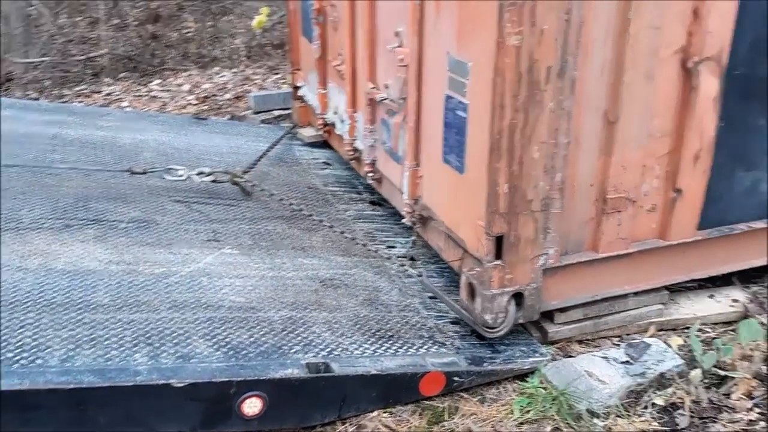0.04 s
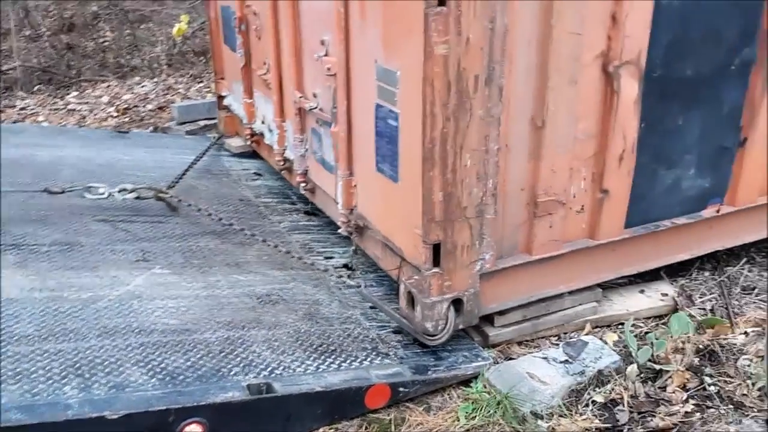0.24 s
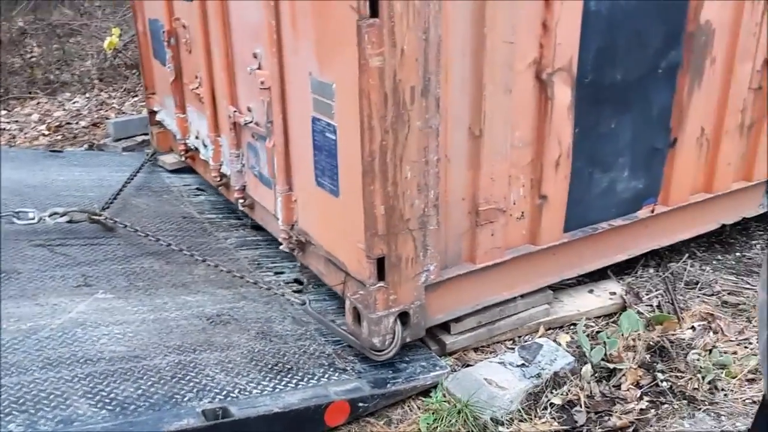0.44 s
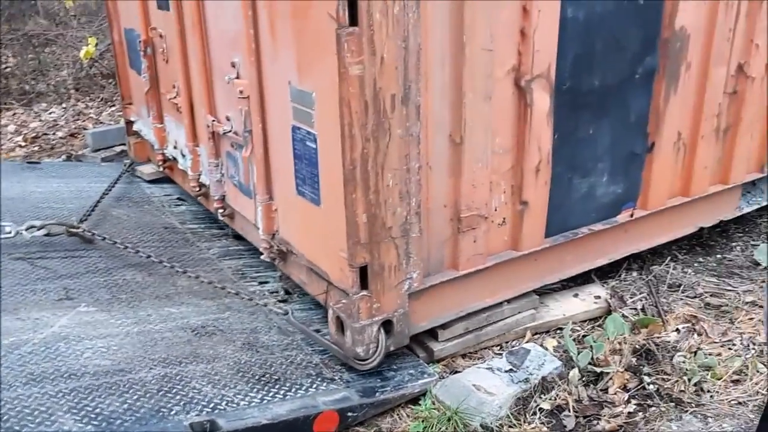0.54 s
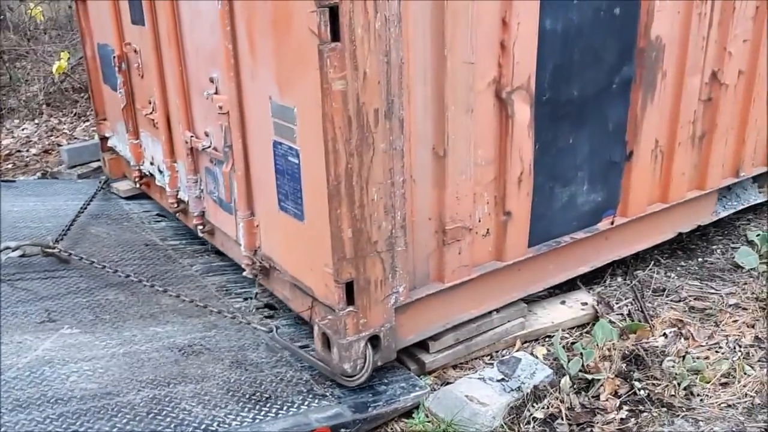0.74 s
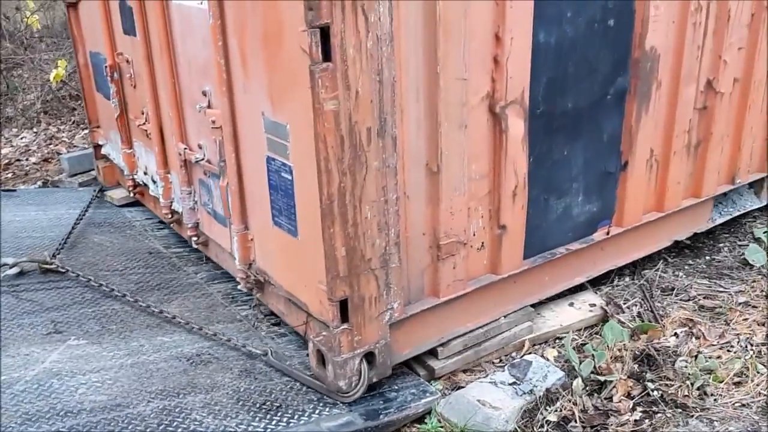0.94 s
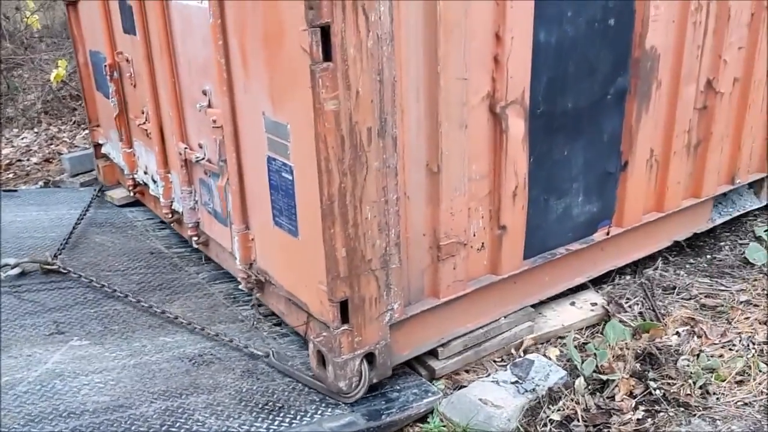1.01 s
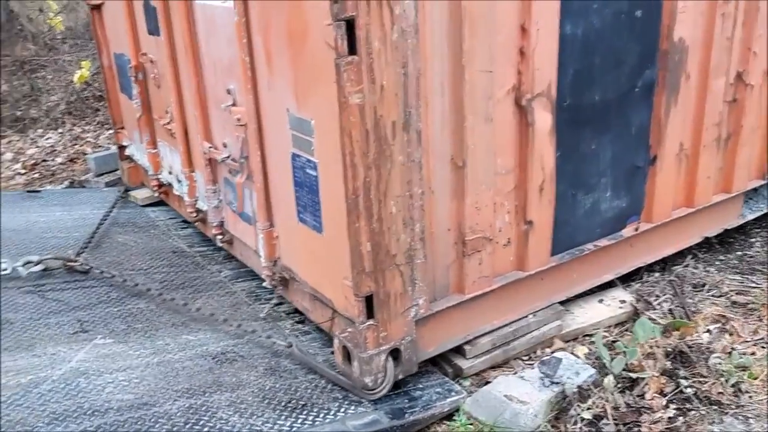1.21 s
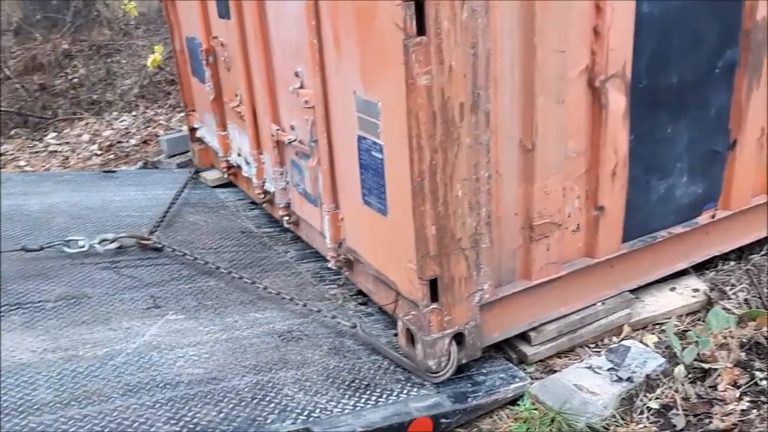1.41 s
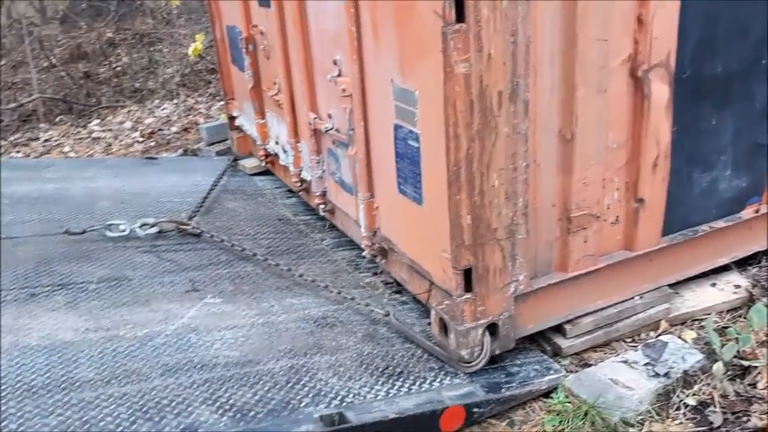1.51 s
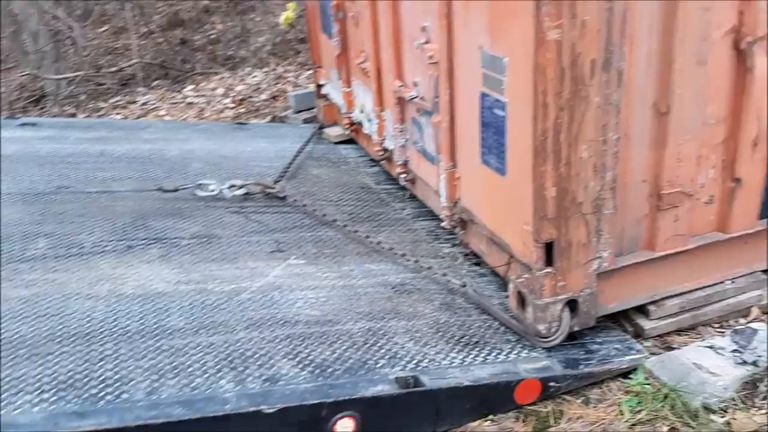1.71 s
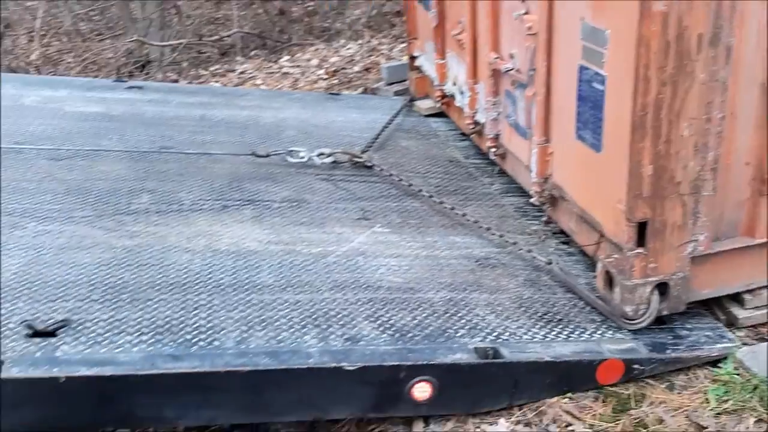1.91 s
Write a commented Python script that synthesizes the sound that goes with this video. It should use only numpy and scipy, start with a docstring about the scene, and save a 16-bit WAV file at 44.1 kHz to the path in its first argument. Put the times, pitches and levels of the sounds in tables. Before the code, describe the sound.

Heavy steel container groans across a truck bed and crashes down, chains jingling.

```python
"""Two juddering groans come first, as a steel shipping container is winched over a truck's tilted bed.
The steel sticks and slips many times a second, and each slip shakes the hollow box.
Then the container drops with a booming crash and a short scrape. Chains clank and jingle as they
take up the load, and grit cracks under the steel. The truck idles and rumbles behind it all, outdoors."""
import sys
import numpy as np
from scipy import signal
from scipy.fft import rfft, irfft
from scipy.io import wavfile

SR = 44100
rng = np.random.default_rng(int(sys.argv[2]) if len(sys.argv) > 2 else 0)


def bounce(signal):
    """Save signal as a 16-bit WAV file at the path given by the first command-line argument."""
    frames = np.transpose(np.atleast_2d(signal))
    limited = np.clip(frames, -1, 1)
    pcm = np.round(limited * 32767).astype(np.int16)
    wavfile.write(sys.argv[1], SR, pcm)


N = 85995
TIME = np.arange(N) / SR

# One list for each shudder. Each row: time in seconds, slips per second, force in dB.
SHUDDER_SLIPS = [
    [(.2078, 48.2, 3.5), (.23, 44.7, 1.5), (.252, 60.5, -3.5), (.283, 67.5, -8.5), (.3, 64, -22.5),
     (.4, 53, -19), (.52, 54.5, -27.5)],
    [(.656, 48.4, -17), (.678, 45.9, -8.5), (.7, 43.7, -20), (.72, 47, -4), (.77, 53, -6),
     (.815, 90.7, -7.5), (.87, 89, -8), (.905, 88, -23.5), (.96, 79, -19)],
]
# The container wall's tones. Each row: pitch in Hz, relative level in dB, fade time in seconds.
WALL_TONES = [(168.9, -5, 0.15), (264.4, 2.5, 0.044), (316.5, -4, 0.03), (347, -6.5, 0.037),
              (422.6, -15.5, 0.11)]
# The tone colour of the hollow box. Each row: frequency in Hz, relative level in dB.
HOLLOW_COLOUR = [(90, -31), (170, 9), (350, -7.5), (500, 1), (1000, -43), (3000, -22), (6500, -24),
                 (16000, -82)]

def shudder():
    """Each slip kicks the container wall and a panel, stirs the hollow box and rasps on the bed."""
    kicks = np.zeros(N)
    for points in SHUDDER_SLIPS:
        times, rates, force_db = np.transpose(points)
        t = np.arange(times[0], times[-1], 1 / SR)
        rate = np.interp(t, times, rates) * (1 + .012 * waver(per_s=74)[:len(t)])
        slip_count = np.floor(np.cumsum(rate) / SR)
        slip_times = t[np.diff(slip_count, prepend=-1) > 0]
        uneven_db = 1.2 * rng.standard_normal(N)[:len(slip_times)]
        kicks[(slip_times * SR).astype(int)] = amp(np.interp(slip_times, times, force_db) + uneven_db)
    wall = sum(amp(db) * decay(fade_s, rise_s=0.0014) * np.sin(2 * np.pi * hz * TIME)
               for hz, db, fade_s in WALL_TONES)
    wall = signal.sosfilt(signal.butter(3, [146.4, 423], "band", fs=SR, output="sos"), wall)
    panel = amp(-21) * decay(0.052, rise_s=0.0027) * np.sin(2 * np.pi * 672 * TIME)
    hollow = amp(-29) * coloured(HOLLOW_COLOUR) * decay(0.62, rise_s=0.007)
    rasp = amp(-26) * coloured(CRASH_COLOUR) * decay(0.049, rise_s=0.0032)
    one_slip = amp(-2) * wall + panel + hollow + rasp
    return signal.fftconvolve(kicks[None], one_slip, axes=1)[:, :N]  # one copy for every kick


# The container hits the bed. Each row: start in seconds, boom in dB, crash in dB, crash fade in seconds.
LANDING_BLOWS = [(.992, -15.5, -19, 0.32), (1.006, -13.5, -19, 1), (1.054, -14.5, -18.5, 0.24),
                 (1.143, -26, -21, 0.48), (1.176, -24.5, -13.5, 0.11), (1.187, -23.5, -19, 0.14),
                 (1.22, -21.5, -23, 0.23), (1.615, -25.5, -33, 0.13)]
# The tone colours of the deep boom and the bright crash. Each row: frequency in Hz, relative level in dB.
BOOM_COLOUR = [(30, -35), (70, -24), (130, -4), (200, 1.5), (310, -4.5), (430, -3.5), (520, -27),
               (1200, -22), (16000, -84)]
CRASH_COLOUR = [(60, -40), (400, 3), (900, -1), (1600, 0.5), (2500, 2), (4200, -7.5), (6300, -7.5),
                (8500, -28), (16000, -29)]

def landing():
    """The container drops: the box booms, and the steel bed crashes and rings."""
    out = np.zeros((2, N))
    for start, boom_db, crash_db, fade_s in LANDING_BLOWS:
        steel = coloured(CRASH_COLOUR, grains(per_s=2500, spread_db=3.0)) + amp(-4) * bed_ring()
        crash = amp(crash_db) * evened(steel) * decay(fade_s, rise_s=0.00092)
        boom = amp(boom_db) * coloured(BOOM_COLOUR) * decay(0.4, rise_s=0.00024)
        add(out, start, boom + crash)
    return out


# The steel bed's tones. Each entry: pitch in Hz.
BED_TONES_HZ = [649, 856, 894, 938, 997, 1190, 1366, 1513, 1996, 2130, 2326, 2621]

def bed_ring():
    """The bed rings with many tones; the higher ones differ more between left and right."""
    hz = np.array(BED_TONES_HZ)[:, None]
    unlike = np.clip(1 - read(STEREO_LIKENESS, hz), 0, 1)
    phase = rng.uniform(0, 2 * np.pi, hz.shape) + unlike * rng.standard_normal((2,) + hz.shape)
    tones = amp(read(CRASH_COLOUR, hz)) * np.sin(2 * np.pi * hz * TIME + phase)
    return evened(tones.sum(1))


# The chain clanks. Each row: start in seconds, knock in dB, knock fade in seconds, snap in dB,
# ring in dB, the part that rings.
CHAIN_CLANKS = [(0.328, -22.5, 0.097, -31, -24, "hook"), (0.9745, -26, 0.39, -37, -23.5, "hook"),
                (1.0136, -9, 0.041, -50, -16.5, "lug"), (1.165, -28, 0.039, -22, -38.5, "chain"),
                (1.1765, -16, 0.095, -54, -17, "lug"), (1.2186, -17, 0.073, -25.5, -18, "shackle"),
                (1.327, -57, 0.13, -36, -33.5, "chain"), (1.3572, -31.5, 0.23, -33, -48, "chain"),
                (1.3835, -29, 0.054, -48, -35, "chain"), (1.466, -35.5, 0.14, -29.5, -27.5, "chain"),
                (1.495, -29, 0.074, -32, -41, "chain"), (1.5462, -14.5, 0.078, -26.5, -22.5, "link"),
                (1.6148, -24.5, 0.099, -63, -34, "chain"), (1.728, -25.5, 0.25, -24, -28.5, "chain"),
                (1.8051, -34.5, 0.15, -39.5, -35.5, "chain"), (1.8652, -33, 0.16, -28.5, -43, "chain"),
                (1.8858, -27.5, 0.15, -45, -44, "chain")]
# The tone colours of a knock and a snap. Each row: frequency in Hz, relative level in dB.
KNOCK_COLOUR = [(300, -18), (900, -3), (1300, 0), (2400, 7.5), (3600, 5), (4600, -43), (6200, -30),
                (8000, -70), (16000, -32)]
SNAP_COLOUR = [(2000, -7.5), (5000, 5.5), (6600, 4.5), (8000, -2), (10500, -6), (12500, -5.5), (16000, -22)]

def chains():
    """A clank is a knock on the bed, a bright snap, a shimmer of links and one ringing steel part."""
    out = np.zeros((2, N))
    for start, knock_db, fade_s, snap_db, ring_db, part in CHAIN_CLANKS:
        knock = amp(knock_db) * coloured(KNOCK_COLOUR) * decay(fade_s)
        snap = coloured(SNAP_COLOUR) * decay(0.069)
        shimmer = amp(-9.5) * link_shimmer(count=22) * decay(0.19)
        add(out, start, knock + amp(snap_db) * (snap + shimmer) + amp(ring_db) * part_ring(part))
    return out


# One list for each steel part. Each row: pitch in Hz, relative level in dB, fade time in seconds.
PART_TONES = {"hook": [(2024, -4.5, 0.14), (2360, -3, 0.14), (2918, 5.5, 0.046), (3220, 1.5, 0.19),
              (4000, 1.5, 0.13), (5520, -9, .27), (5980, -8.5, 0.2), (6700, -8.5, 0.27), (9060, -18, 0.4),
              (9500, -15, 0.25), (10400, -11.5, 0.42)], "link": [(1270, 0.5, 0.053), (1740, 7, 0.044),
              (2505, 1.5, 0.065), (3634, 10, 0.071), (4000, 0, 0.11), (5450, -11, 0.35), (6040, -11, 0.56),
              (8530, -21.5, 0.59), (9260, -15, .3), (9840, -6.5, 0.15), (10500, -16, 0.17),
              (11360, -12.5, 0.21)], "shackle": [(2284, 5, 0.12), (2344, -0.5, 0.15), (6180, -6.5, 0.11),
              (7100, -9, 0.078), (10440, -17.5, 0.23)], "lug": [(2180, -9, 0.082), (2453, 5.5, 0.032),
              (2960, -6, 0.054)], "chain": [(3100, -8, 0.58), (3810, -2, 0.41), (4200, -8, 0.54),
              (4500, -19, 0.14), (5180, -2.5, 0.17), (7220, -15, 0.13), (10030, -7, 0.16)]}

def part_ring(part):
    """Each tone of a steel part pulses against a close twin and wobbles as the part chatters."""
    out = np.zeros((2, N))
    for hz, db, fade_s in PART_TONES[part]:
        cycles = np.cumsum(hz * (1 + .011 * waver(per_s=220)))[:SR // 2] / SR
        twin_cycles = cycles * (1 + .02 * rng.uniform(-1, 1))
        tone = np.sin(2 * np.pi * (cycles + rng.random((2, 1))))
        twin = amp(-6) * np.sin(2 * np.pi * (twin_cycles + rng.random((2, 1))))
        loudness = decay(fade_s) * (1 + 0.6 * waver(per_s=220))
        side_gains = amp(db + 1.5 * rng.standard_normal((2, 1)))
        add(out, 0, side_gains * loudness[:len(cycles)] * (tone + twin))
    return out


def link_shimmer(count):
    """Links that happen to touch give off high, unrelated tones."""
    spectrum = np.zeros((2, N // 2 + 1), complex)
    hz = np.geomspace(3000, 14500, count) * rng.uniform(.96, 1.04, count)
    phases = np.exp(2j * np.pi * rng.random((2, count)))
    spectrum[:, (hz * N / SR).astype(int)] = amp(read(SNAP_COLOUR, hz)) * phases
    return evened(irfft(spectrum, N))


# How loud the grinding steel and the loose chain are. Each row: time in seconds, level in dB.
SCRAPE_LEVELS = [(0, -53), (.2, -55), (.25, -44), (.31, -49), (.5, -52), (.68, -54), (.8, -49), (.97, -48),
                 (1.02, -26), (1.037, -16), (1.06, -25), (1.12, -39), (1.17, -34), (1.3, -50), (1.95, -54)]
RATTLE_LEVELS = [(0, -49), (.25, -42), (.66, -45), (.96, -45.5), (1.05, -23), (1.21, -32.5), (1.33, -34.5),
                 (1.7, -38.5), (1.95, -44.5)]
# The tone colours of grit and loose chain. Each row: frequency in Hz, relative level in dB.
GRIT_COLOUR = [(200, -11), (900, 10.5), (2000, -3), (3500, 4), (6500, 3.5), (8500, -4), (11000, -2),
               (16000, -16)]
LOOSE_CHAIN_COLOUR = [(200, -24), (500, 1.5), (1000, 3.5), (2300, -3), (4000, -3), (5000, -16.5),
                      (7000, -20), (9000, -31), (16000, -46)]
# Single cracks of grit. Each row: start in seconds, level in dB.
GRIT_CRACKS = [(0.21, -29.5), (0.252, -37), (0.267, -39), (0.4394, -31), (.531, -33.5), (0.5877, -22),
               (0.6671, -31.5), (0.7028, -33), (0.9959, -10.5)]
GRAINS_PER_S, GRAIN_SPREAD_DB = 520, 3.2

def grit_and_rattle():
    """Steel grinds over the bed and cracks the grit, while loose chain rattles."""
    impacts = grains(GRAINS_PER_S, GRAIN_SPREAD_DB)
    one_grain = rng.standard_normal((2, N)) * decay(0.008)
    crunch = signal.fftconvolve(impacts, one_grain, axes=1)[:, :N]
    out = level(SCRAPE_LEVELS) * coloured(GRIT_COLOUR, crunch)
    out += level(RATTLE_LEVELS) * coloured(LOOSE_CHAIN_COLOUR, grains(per_s=4300, spread_db=0.5))
    for start, db in GRIT_CRACKS:
        add(out, start, amp(db) * coloured(GRIT_COLOUR) * decay(0.03, rise_s=0.0002))
    return out


# Short rubs. Each row: start in seconds, length in seconds, pitch in Hz, band width in Hz, level in dB.
STEEL_RUBS = [(.215, .075, 750, 350, -35), (.22, .06, 3400, 600, -33), (.3, .009, 3500, 500, -28),
              (.43, .024, 4900, 350, -37), (.54, .07, 1150, 500, -41)]

def rubs():
    """Steel rubs on steel: a gritty sound swells and fades around one pitch."""
    out = np.zeros((2, N))
    for start, length, hz, width_hz, db in STEEL_RUBS:
        friction = grains(GRAINS_PER_S, GRAIN_SPREAD_DB)
        band = signal.lfilter(*signal.iirpeak(hz, hz / width_hz, SR), friction)
        swell = np.sin(np.pi * np.minimum(TIME / length, 1))
        add(out, start, amp(db) * evened(band) * swell)
    return out


# The tone colours of the idling engine and the bed. Each row: frequency in Hz, relative level in dB.
IDLE_COLOUR = [(25, -18), (55, -2.5), (120, -1.5), (330, 0.5), (450, -18), (800, -17), (2000, -39),
               (4000, -21), (5000, -32), (16000, -35.5)]
BED_RUMBLE_COLOUR = [(20, -39), (40, -8), (58, -4.5), (100, 2.5), (180, 5), (400, -3), (600, -19.5),
                     (2000, -31.5), (16000, -87)]
# How loud the rumble and the drone are. Each row: time in seconds, level in dB.
RUMBLE_LEVELS = [(0, -48), (.3, -32), (.4, -27), (.55, -35), (.8, -22), (1.1, -29.5), (1.35, -28.5),
                 (1.55, -32.5), (1.75, -37.5), (1.95, -38.5)]
DRONE_LEVELS = [(0, -72), (1.35, -58.5), (1.48, -33), (1.7, -40.5), (1.95, -40)]

def truck():
    """The engine idles, the bed rumbles, and a wavering low drone comes up near the end."""
    drone_hz = 92 + 2.03 * waver(per_s=9.9)
    drone_gain = level(DRONE_LEVELS) * amp(6.2 * waver(per_s=18))
    drone = drone_gain * np.sqrt(2) * np.sin(2 * np.pi * np.cumsum(drone_hz) / SR)
    idle = amp(-40.5) * coloured(IDLE_COLOUR)
    rumble = level(RUMBLE_LEVELS) * coloured(BED_RUMBLE_COLOUR)
    return idle + rumble + drone


# How alike left and right sound. Each row: frequency in Hz, likeness from 0 (unrelated) to 1 (the same).
STEREO_LIKENESS = [(100, .99), (300, .96), (600, .82), (1200, .6), (2500, .2), (5000, 0)]

def coloured(colour, drive=None):
    """Gives noise, or the sound in drive, a tone colour and spreads it over left and right."""
    left, other = rfft(rng.standard_normal((2, N)) if drive is None else drive)
    hz = np.fft.rfftfreq(N, 1 / SR)
    same = np.clip(read(STEREO_LIKENESS, hz), -1, 1)
    right = same * left + np.sqrt(1 - same ** 2) * other
    return evened(irfft(np.array([left, right]) * amp(read(colour, hz)), N))


def grains(per_s, spread_db):
    """Tiny impacts of uneven size at random moments."""
    impacts = rng.standard_normal((2, N)) * (rng.random((2, N)) < per_s / SR)
    return impacts * amp(spread_db * np.minimum(rng.exponential(1, (2, N)), 4))


def decay(fade_s, rise_s=0.00075):
    """Rises quickly, then dies away by 60 dB in fade_s seconds."""
    return (1 - np.exp(-TIME / rise_s)) * np.exp(-np.log(1000) * TIME / fade_s)


def waver(per_s):
    """A random wobble of about size 1 that heads for a new value per_s times a second."""
    return np.interp(TIME * per_s, np.arange(N), rng.standard_normal(N))


def amp(db):
    """Turns decibels into a gain to multiply by."""
    return 10 ** (np.asarray(db) / 20)


def evened(sound):
    """Scales a sound to an average (rms) level of 1."""
    return sound / np.sqrt(np.mean(sound ** 2) + 1e-20)


def read(points, hz):
    """Looks up a frequency in a table, gliding between rows on a log scale."""
    row_hz, values = np.transpose(points)
    return np.interp(np.log(hz + 1), np.log(row_hz + 1), values)


def level(points):
    """Turns rows of time and dB into a gain for every sample."""
    return amp(np.interp(TIME, *np.transpose(points)))


def add(mix, start, sound):
    """Mixes a sound in at a start time in seconds."""
    part = mix[:, round(start * SR):][:, :sound.shape[-1]]
    part += sound[..., :part.shape[-1]]


def scene():
    """The container, the chains, the grit and the truck together."""
    return shudder() + landing() + chains() + grit_and_rattle() + rubs() + truck()


# Which side is louder. Each row: frequency in Hz, left minus right in dB.
STEREO_BALANCE = [(60, 1), (250, 1.5), (600, 3), (1300, 2.5), (2500, 7.5), (3800, 4.5), (6000, -5),
                  (10000, -6.5), (15000, -4)]

def record(dry):
    """The left microphone favours the mids, the right the treble; the very highest treble is cut."""
    lean = amp(read(STEREO_BALANCE, np.fft.rfftfreq(2 * N, 1 / SR)))
    gains = np.array([lean, np.ones_like(lean)]) * np.sqrt(2 / (1 + lean ** 2))
    heard = irfft(rfft(dry, 2 * N) * gains)[:, :N]
    treble_cut = signal.firwin(511, cutoff=16100, window=("kaiser", 9), fs=SR)
    return signal.oaconvolve(heard, treble_cut[None], "same")


dry = scene()
out = record(dry)
bounce(out)
```